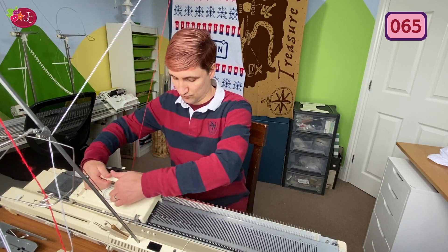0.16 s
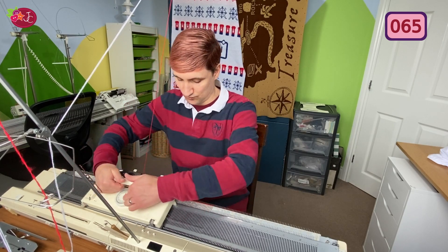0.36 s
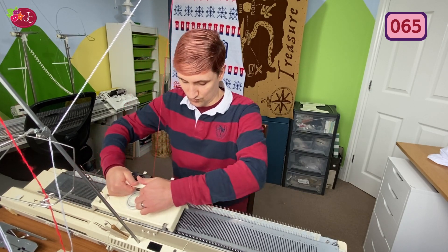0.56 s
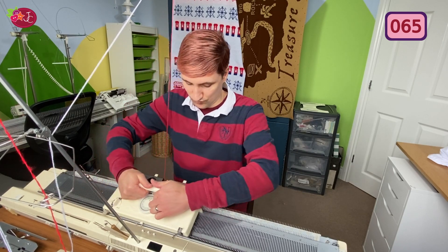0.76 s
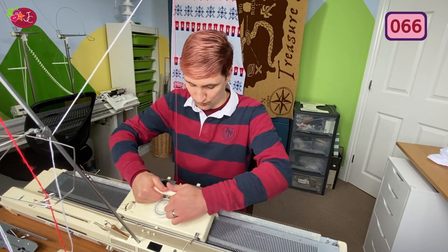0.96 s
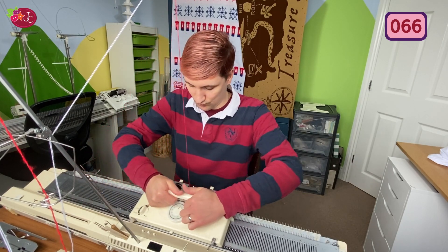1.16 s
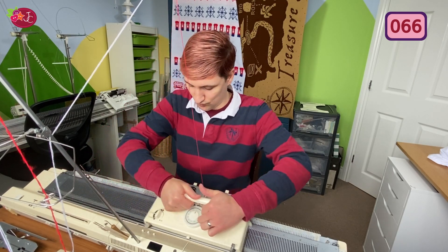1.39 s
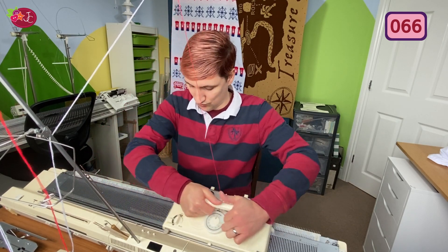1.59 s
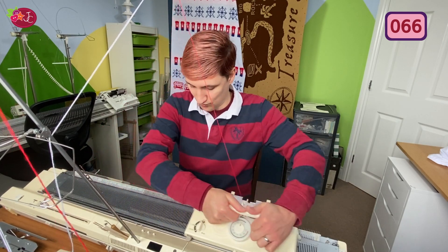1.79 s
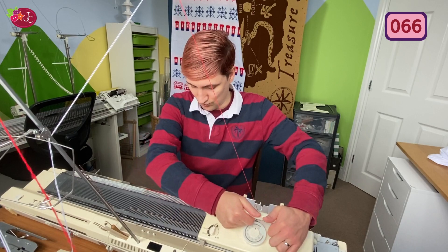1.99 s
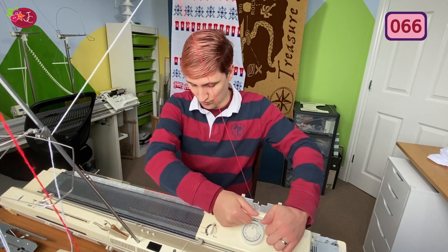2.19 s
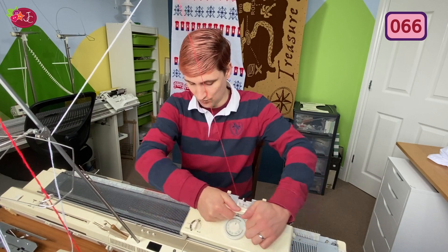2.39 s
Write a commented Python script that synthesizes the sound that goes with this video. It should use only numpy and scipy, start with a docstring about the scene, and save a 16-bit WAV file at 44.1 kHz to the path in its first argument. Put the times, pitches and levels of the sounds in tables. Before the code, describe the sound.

Close up in a small room, a knitting machine carriage is pushed across the needles, rasping and rattling with brief high squeaks. The row counter snaps twice, the sliding dies away and small steel parts tick as they settle.

```python
"""A rasp of sliding steel and plastic swells up: a knitting carriage is pushed along its needle bed,
close to a single microphone in a small room. Cams knock each needle in turn, the bed and table hum,
a guide squeaks and the row counter trips with a sharp click. The carriage creaks to a stop,
loose metal parts tick and ring, and the next stroke begins."""
import sys
import numpy as np
from scipy import signal
from scipy.fft import rfft, irfft, next_fast_len
from scipy.io import wavfile
from scipy.ndimage import map_coordinates

SR = 44100
rng = np.random.default_rng(int(sys.argv[2]) if len(sys.argv) > 2 else 0)


def wav_out(sig):
    """Save sig, one row per channel (or a flat mono array), as 16-bit PCM at SR to the path in sys.argv[1]."""
    wavfile.write(sys.argv[1], SR, np.round(np.clip(np.atleast_2d(sig).T, -1, 1) * 32767).astype(np.int16))


N = 108045
TIME = np.arange(N) / SR
CRACK_RISE_S = 0.00064
CREST_DB = 10  # a noise burst's rms lies this far below its nominal peak


def amp(db):
    return 10 ** (np.asarray(db) / 20)


def unit(x):
    return x / np.sqrt(np.mean(x ** 2) + 1e-20)


def along(points, hz):
    """Interpolate (Hz, value) points on a log frequency axis."""
    f, v = np.transpose(points)
    return np.interp(np.log(hz + 1), np.log(f + 1), v)


def curves(rows):
    """One value per sample for each column after the time."""
    seconds, *columns = np.transpose(rows)
    return [np.interp(TIME, seconds, column) for column in columns]


def wobble(rate):
    """A smooth random curve, rate knots a second."""
    return map_coordinates(rng.standard_normal(int(N * rate / SR) + 4), [TIME * rate])


def filtered(x, response):
    """Filter x by a gain given as a function of frequency."""
    size = next_fast_len(N + SR // 2)
    return irfft(rfft(x, size) * response(np.fft.rfftfreq(size, 1 / SR)), size)[:N]


def noise(spectrum):
    """Coloured noise of rms 1."""
    return unit(filtered(rng.standard_normal(N), lambda f: amp(along(spectrum, f))))


def modes(rows):
    """Causal response of a set of resonances of alternating sign."""
    return lambda f: sum((-1) ** k * amp(db) * 1j * f * width / (hz * hz - f * f + 1j * f * width)
                         for k, (hz, width, db) in enumerate(rows))


def burst(start, t60, rise):
    """Envelope of a hit: quick rise, exponential decay, all times in seconds."""
    age = np.maximum(TIME - start, 0)
    return (1 - np.exp(-age / rise)) * amp(-60 * age / t60)


def room_tone():
    """The low, steady air of the room behind the machine."""
    # Each row: frequency in Hz, relative level in dB.
    spectrum = [(15, -30), (50, -8), (100, -0.5), (300, -7), (1200, -13.5), (2000, -9), (6000, -23),
                (10300, -39), (15900, -35)]
    return amp(-54) * noise(spectrum)


def room_echo(x):
    """The walls answer 200 samples late, and the treble dies first."""
    # Each row: frequency in Hz, t60 in seconds.
    decay = [(200, 0.54), (12000, 0.16)]
    hz, t, bands = signal.stft(rng.standard_normal(SR // 2), SR, nperseg=256)
    tail = signal.istft(bands * amp(-60 * t / along(decay, hz)[:, None]), SR, nperseg=256)[1]
    return signal.fftconvolve(np.pad(x, (200, 0)), tail / np.linalg.norm(tail))[:N]


def bed_hum():
    """At speed the bed hums at roughly twice the needle rate."""
    # Each row: time in seconds, pitch in Hz, level in dB.
    track = [(.55, 99.8, -40), (.68, 105.4, -65), (.78, 115.6, -36), (.95, 114.5, -36.5),
             (1.15, 113, -40.5), (1.45, 113, -53)]
    hz, db = curves(track)
    gate = np.clip(np.minimum(TIME - track[0][0], track[-1][0] - TIME) / 0.025, 0, 1)
    return gate * np.sqrt(2) * amp(db) * np.sin(2 * np.pi * np.cumsum(hz) / SR)


def creak(width_hz=300):
    """A rough, narrow band of noise slides upward as the carriage comes to rest."""
    # Each row: time in seconds, centre in Hz, level in dB.
    track = [(1.8, 1350, -50), (1.87, 1520, -51), (2.02, 1760, -52), (2.12, 1800, -68)]
    hz, db = curves(track)
    gate = (TIME > track[0][0]) & (TIME < track[-1][0])
    phase = 2 * np.pi * np.cumsum(hz) / SR
    return gate * amp(db) * unit(wobble(width_hz) * np.cos(phase) + wobble(width_hz) * np.sin(phase))


def guide_squeaks(waver_hz=45, flutter_db=2.5, edge_s=.005):
    """A sliding guide gives short, unsteady whistles."""
    # Each row: start in seconds, length in seconds, level in dB, pitch in Hz.
    squeaks = [(0.02, 0.025, -42.5, 10950), (0.832, 0.019, -30.5, 8760), (.93, 0.061, -35, 8750),
               (1.05, 0.065, -32, 8900), (1.172, 0.063, -32, 8720), (1.357, 0.013, -28, 4270),
               (1.227, 0.039, -30, 8880), (1.281, 0.051, -32, 8730)]
    waver = waver_hz * wobble(61)
    flutter = amp(flutter_db * wobble(110))
    whistles = np.zeros(N)
    for start, length, db, hz in squeaks:
        gate = np.clip(np.minimum(TIME - start, start + length - TIME) / edge_s, 0, 1)
        whistles += gate * np.sqrt(2) * amp(db) * np.sin(2 * np.pi * np.cumsum(hz + waver) / SR)
    return flutter * whistles


def loose_parts():
    """Small steel parts tick as they settle; some ring on one thin note until damped."""
    # Each row: start in seconds, nominal peak in dB.
    ticks = [(1.9663, -12.5), (1.9734, -19), (2.004, -40), (2.0777, -38.5), (2.142, -27.5), (2.2076, -26.5),
             (2.2468, -39)]
    # Each row: frequency in Hz, relative level in dB.
    tick_spectrum = [(900, -30), (3000, -21), (8500, -13), (9250, -4), (9800, -12), (10500, -3),
                     (11600, -23), (15900, -30)]
    # Each row: start in seconds, pitch in Hz, level in dB, t60 in seconds, end in seconds.
    pings = [(1.83, 11800, -51, .35, 1.97), (1.852, 4360, -46, .6, 1.962), (1.968, 13990, -54, .55, 2.3),
             (2.018, 4335, -55, .85, 2.4)]
    taps = sum(amp(db - CREST_DB) * burst(start, t60=0.024, rise=0.00035) for start, db in ticks)
    metal = noise(tick_spectrum) * taps
    for start, hz, db, t60, end in pings:
        level = np.sqrt(2) * amp(db + 3.5 * wobble(40.03))
        damping = np.clip((end - TIME) / 0.0073, 0, 1)
        metal += level * burst(start, t60, rise=0.0015) * damping * np.sin(2 * np.pi * hz * TIME)
    return metal


def row_counter():
    """The counter trips: a brief snap, a bright rattle and the hollow ring of its housing."""
    # Each row: start in seconds, the rattle's nominal peak in dB, ring gain over the rattle in dB,
    # rattle t60 in seconds, snap over the rattle in dB.
    clicks = [(1.4422, 1.5, -3.5, 0.11, 9), (1.7395, -12, -7, 0.07, 15.5)]
    # Each row of both: frequency in Hz, relative level in dB.
    rattle_spectrum = [(1300, -7.5), (3500, -0.5), (6700, -7), (9100, 2.5), (15900, -15)]
    housing_modes = [(400, -12), (530, -11), (630, -4), (690, -8), (836, -2), (2730, -8), (3670, -7),
                     (4078, -8)]
    snap_noise = noise([(150, -42), (600, -8)])
    sound = np.zeros(N)
    for start, peak_db, ring_db, t60, snap_db in clicks:
        rattle = noise(rattle_spectrum) * burst(start, t60, CRACK_RISE_S)
        snap = amp(snap_db) * snap_noise * burst(start, t60=.016, rise=CRACK_RISE_S)
        housing = sum(amp(db) * np.sin(2 * np.pi * (hz * TIME + rng.random()))
                      for hz, db in housing_modes)
        ring = amp(ring_db) * housing * burst(start, t60=.1, rise=0.001)
        sound += amp(peak_db - CREST_DB) * (rattle + snap + ring)
    return sound


def latch_jingle(per_s=500, low_hz=1800, high_hz=12000, t60=.06, spread_db=2.2):
    """Loose needles and latches ring briefly, each on a pitch of its own."""
    when, pitch, strength = np.hsplit(rng.random((int(per_s * N / SR), 3)), 3)
    t = np.arange(int(t60 * SR)) / SR
    hz = low_hz * (high_hz / low_hz) ** pitch
    rings = amp(-spread_db * np.log(1 - strength) - 60 * t / t60) * np.sin(2 * np.pi * hz * t)
    at = (when * N).astype(int) + np.arange(len(t))
    return unit(np.bincount(at.ravel(), rings.ravel())[:N])


def needle_knocks(rate, needle_at_s=.1237, jitter_s=.0006, spread_db=1.8):
    """Envelope of the cams striking each needle, a little uneven in time and force."""
    passed = np.cumsum(rate) / SR
    at = np.flatnonzero(np.diff(np.floor(passed - passed[round(needle_at_s * SR)])))
    timing, force = rng.standard_normal((len(at), 2)).T
    blows = np.zeros(N)
    blows[np.clip(at + (jitter_s * SR * timing).astype(int), 0, N - 1)] = amp(spread_db * force)
    knock = burst(0, t60=.04, rise=CRACK_RISE_S)[:SR // 8]
    return unit(signal.fftconvolve(blows, knock)[:N])


def carriage(grit_per_s=1600, grit_db=-7, jingle_db=-9):
    """Needle knocks and grit roughen one sliding noise that drives steel, plastic body and table."""
    # Each row: time in seconds, then the levels of steel, body and table in dB.
    stroke = [(0, -51, -46, -50), (.085, -37.5, -40, -52), (.12, -32, -39.5, -54), (.31, -28, -36, -45),
              (.52, -28.5, -36.5, -43.5), (.7, -25.5, -34, -36.5), (.83, -21.5, -28, -42.5),
              (1.05, -24, -32.5, -40.5), (1.38, -27, -33, -40.5), (1.5, -23, -33, -38.5),
              (1.65, -25, -33, -41.5), (1.76, -31, -35.5, -45.5), (1.855, -41, -41, -47.5),
              (1.89, -48.5, -54, -50), (2.03, -62, -57, -57), (2.21, -66, -70, -67), (2.26, -61, -57, -62),
              (2.405, -57.5, -58, -68), (2.416, -42, -44.5, -69), (2.45, -36, -47, -51)]
    # Each row: time in seconds, needles passed per second, share of distinct knocks from 0 to 1.
    needles = [(0, 64, .1), (.12, 64, .9), (.27, 58, .12), (.55, 49, .25), (.9, 58, .1), (1.65, 74, .12),
               (1.83, 78, .7), (1.9, 78, 0), (2.42, 78, .8)]
    # Each row: frequency in Hz, relative level in dB.
    rasp_spectrum = [(700, -20.5), (1100, -6), (1600, -12.5), (2500, -9.5), (6900, -11), (9000, -7),
                     (12000, -10.5), (15900, -17.5)]
    # Each row of all three: resonance in Hz, width in Hz, gain in dB.
    steel_peaks = [(1930, 670, 5), (3330, 710, 4), (4990, 530, 5)]
    body_modes = [(306, 39, -10), (385.6, 41, -0.5), (463, 20.7, 0.5), (529.6, 30.5, 0), (628.8, 28.6, 6),
                  (696, 49, 3.5), (824, 97, 0.5), (975.2, 39, 5)]
    table_modes = [(109.7, 10.8, -0.5), (149.6, 5.3, 7.5), (228.3, 54, -9)]
    steel_db, body_db, table_db = curves(stroke)
    rate, share = curves(needles)
    roughness = np.sqrt(1 - share) + np.sqrt(share) * needle_knocks(rate)
    grit = unit((rng.random(N) < grit_per_s / SR) * rng.standard_normal(N))
    drive = roughness * (rng.standard_normal(N) + amp(grit_db) * grit)
    lift_db = lambda f: sum(db / (1 + (2 * (f - hz) / width) ** 2) for hz, width, db in steel_peaks)
    rasp = unit(filtered(drive, lambda f: amp(along(rasp_spectrum, f) + lift_db(f))))
    steel = unit(rasp + amp(jingle_db) * latch_jingle())
    body = unit(filtered(drive + rng.standard_normal(N), modes(body_modes)))
    low_cut = lambda f: f ** 2 / (f ** 2 + 70 ** 2)
    table = unit(filtered(drive, lambda f: modes(table_modes)(f) * low_cut(f)))
    return steel * amp(steel_db) + body * amp(body_db) + table * amp(table_db)


def scene():
    """The machine close up over room tone; only its clicks and ticks come back off the walls."""
    hits = row_counter() + loose_parts()
    sliding = carriage() + bed_hum() + guide_squeaks() + creak()
    return (sliding + hits + amp(-6) * room_echo(hits) + room_tone())[None]


def record(dry, ceiling=1.1, top_hz=15980):
    """One microphone channel: the loudest click is rounded off and the top treble is cut."""
    soft = dry[0] / (1 + np.abs(dry[0] / ceiling) ** 6) ** (1 / 6)
    return filtered(soft, lambda hz: hz < top_hz)[None]


dry = scene()
out = record(dry)
wav_out(out)
```